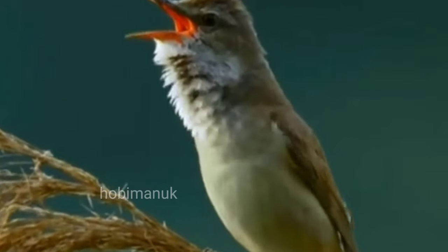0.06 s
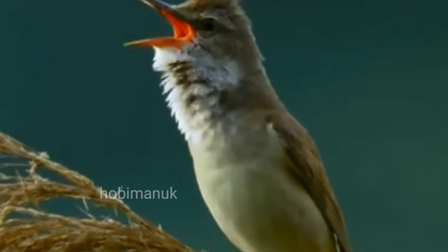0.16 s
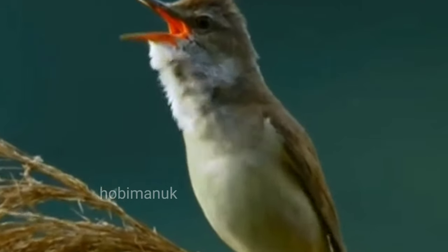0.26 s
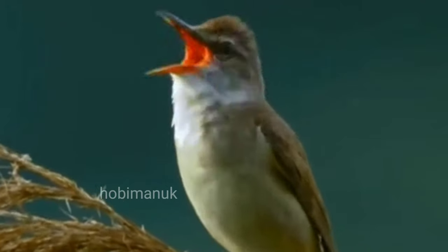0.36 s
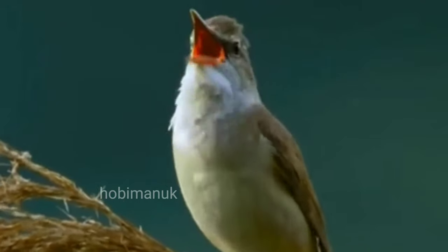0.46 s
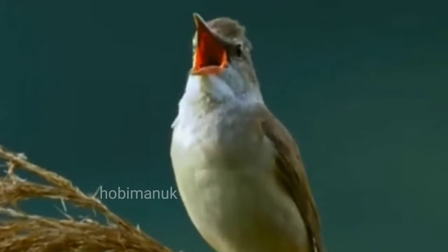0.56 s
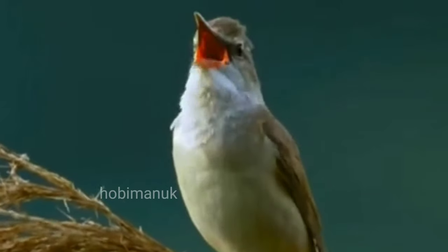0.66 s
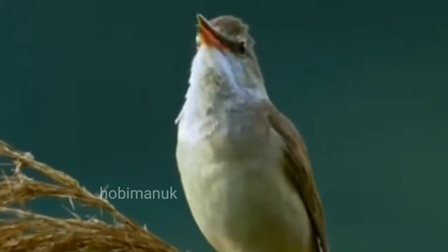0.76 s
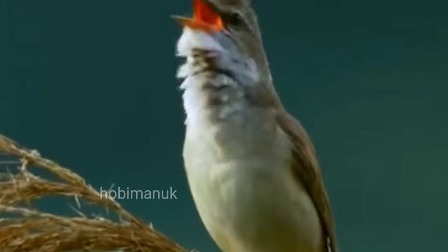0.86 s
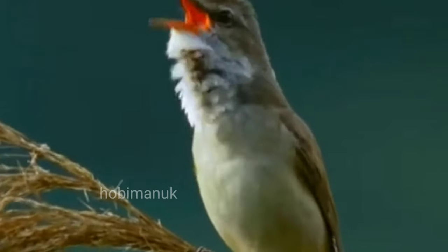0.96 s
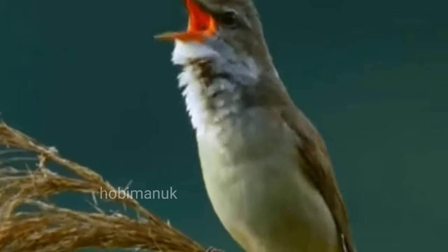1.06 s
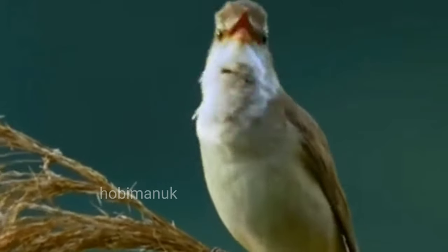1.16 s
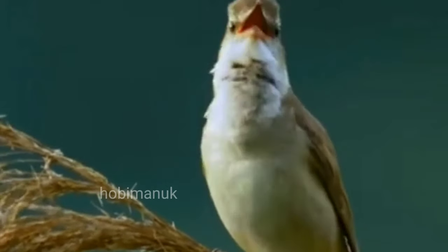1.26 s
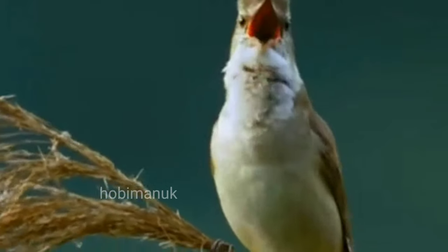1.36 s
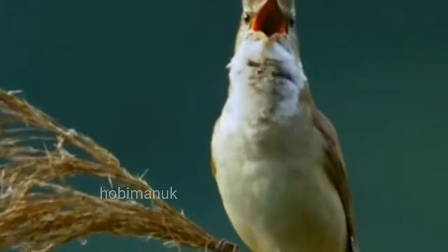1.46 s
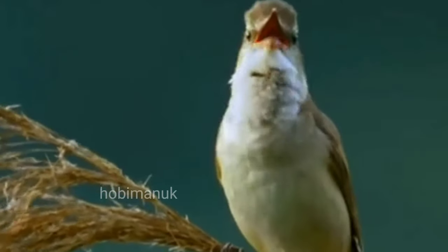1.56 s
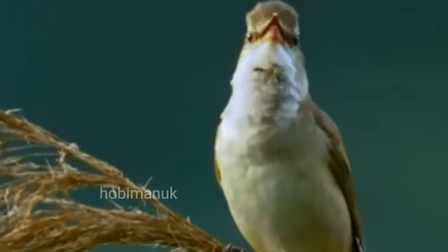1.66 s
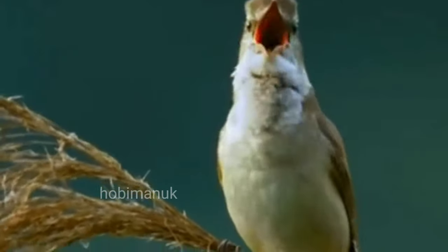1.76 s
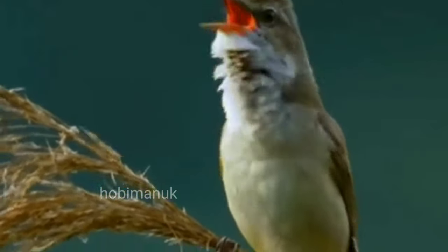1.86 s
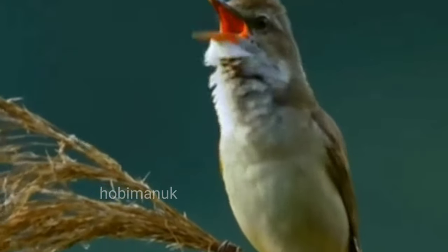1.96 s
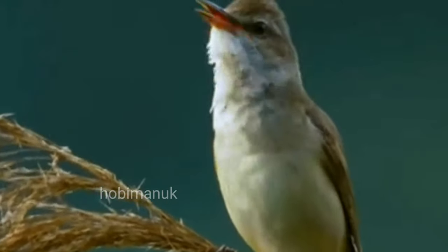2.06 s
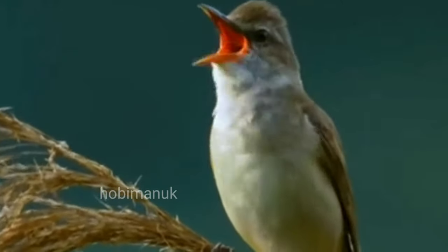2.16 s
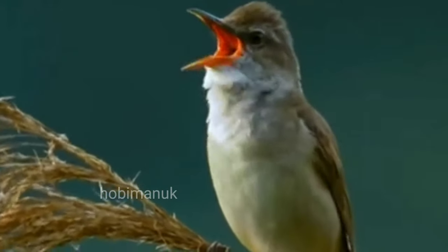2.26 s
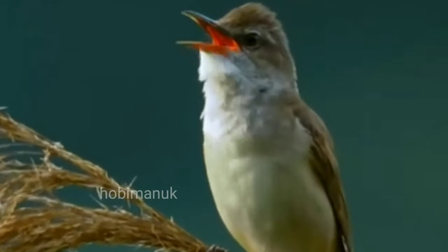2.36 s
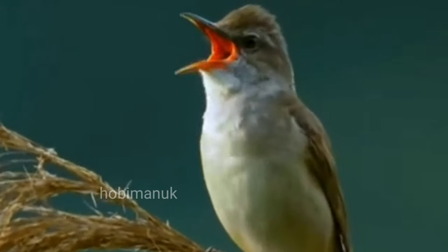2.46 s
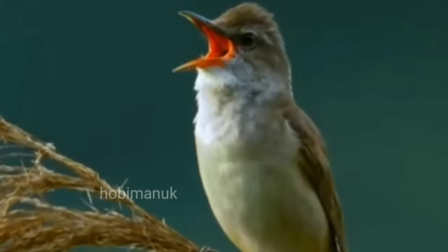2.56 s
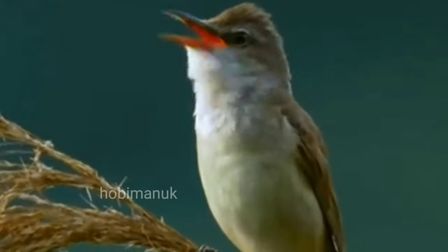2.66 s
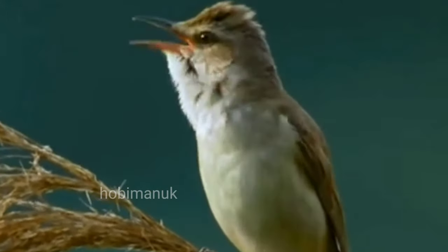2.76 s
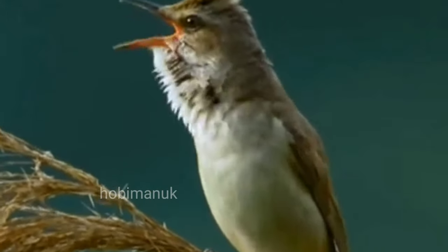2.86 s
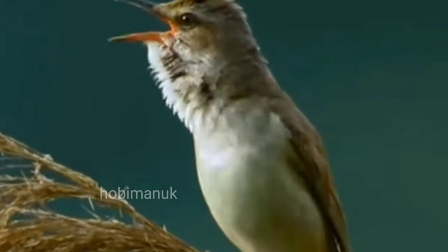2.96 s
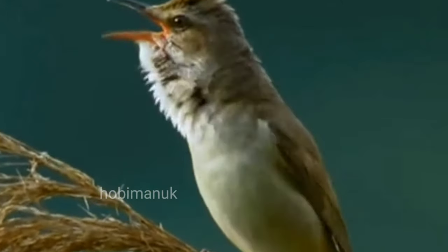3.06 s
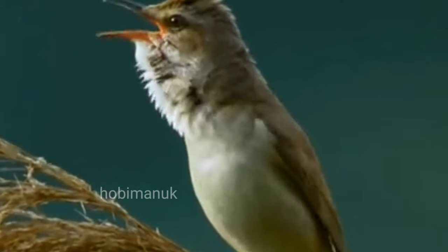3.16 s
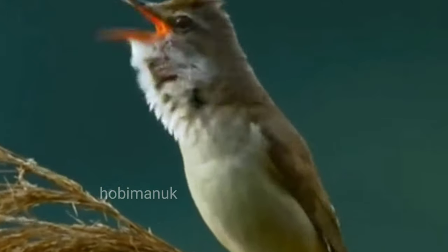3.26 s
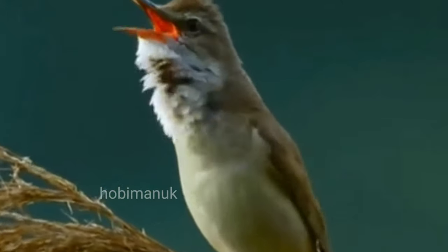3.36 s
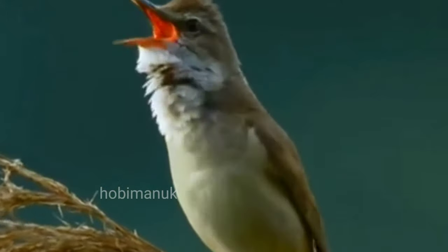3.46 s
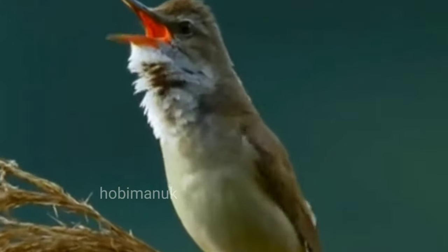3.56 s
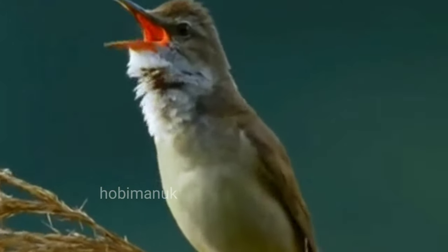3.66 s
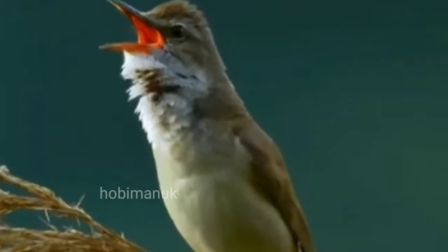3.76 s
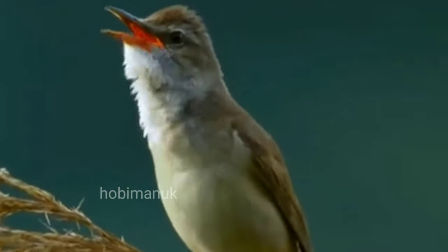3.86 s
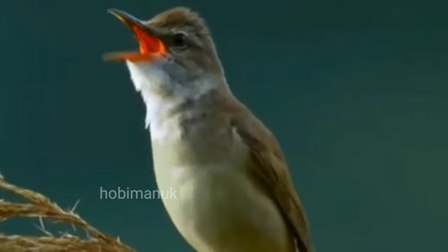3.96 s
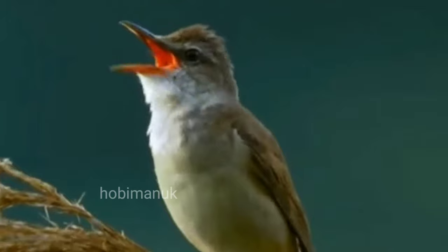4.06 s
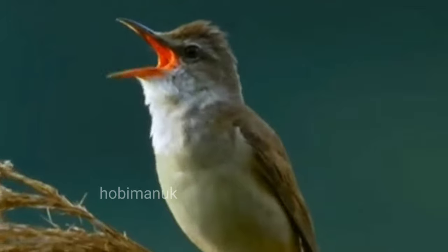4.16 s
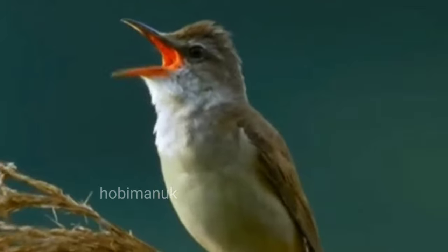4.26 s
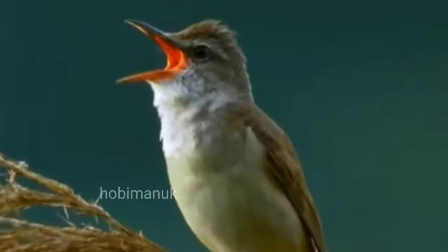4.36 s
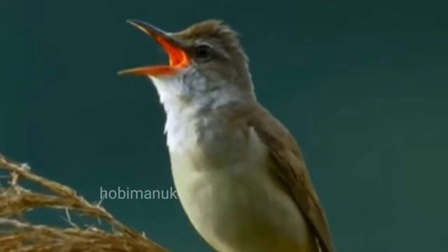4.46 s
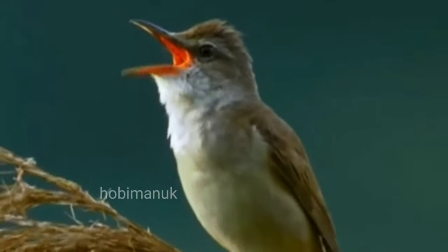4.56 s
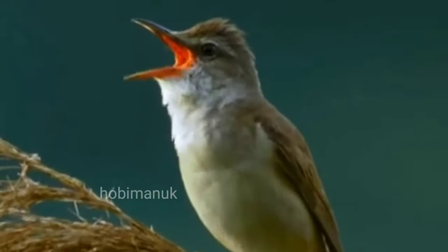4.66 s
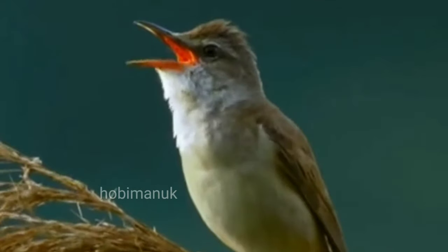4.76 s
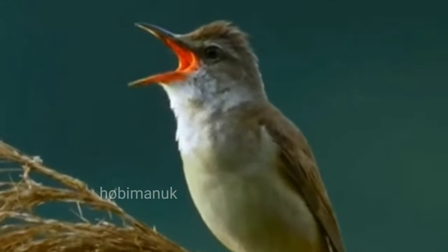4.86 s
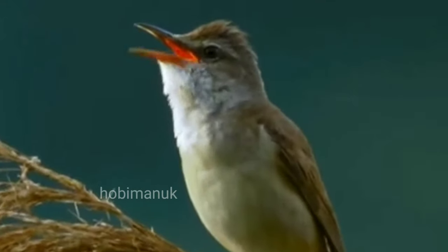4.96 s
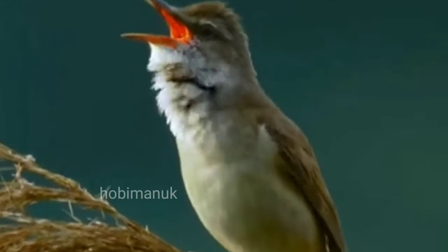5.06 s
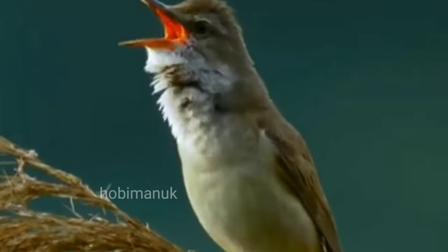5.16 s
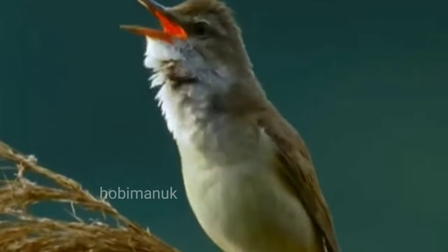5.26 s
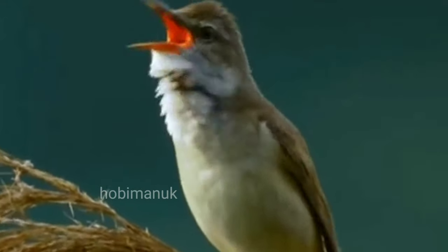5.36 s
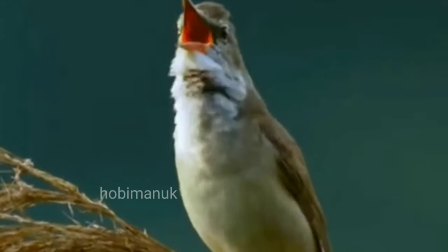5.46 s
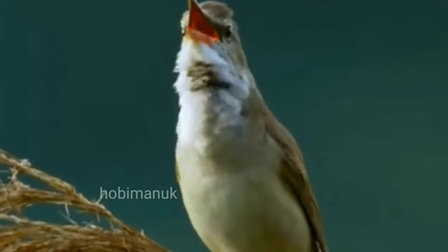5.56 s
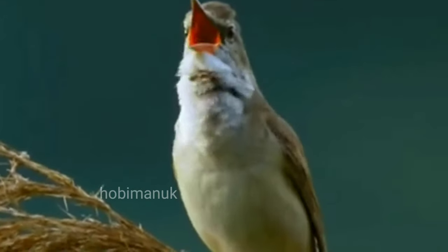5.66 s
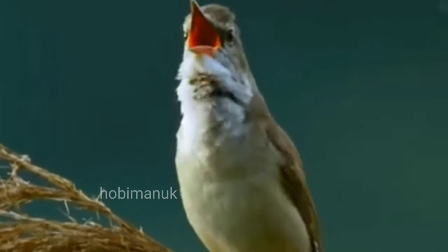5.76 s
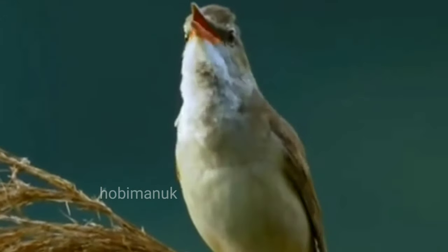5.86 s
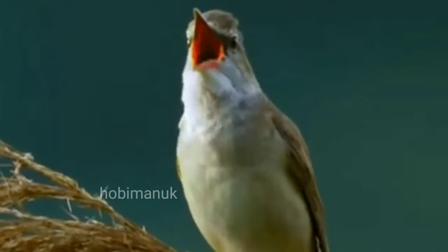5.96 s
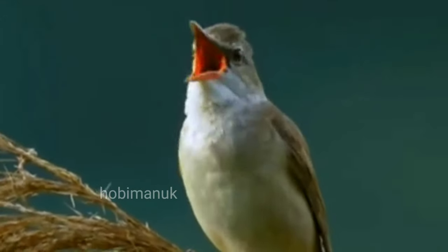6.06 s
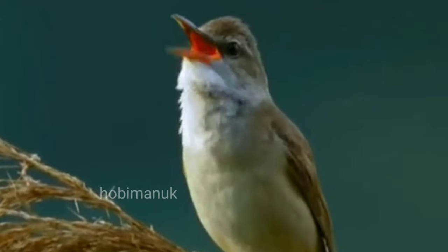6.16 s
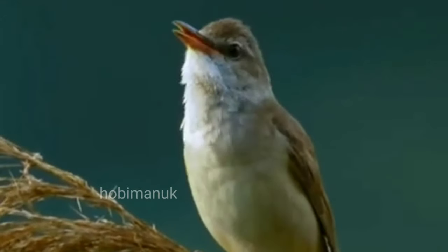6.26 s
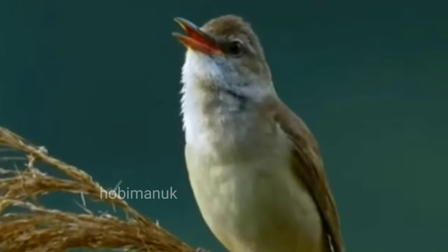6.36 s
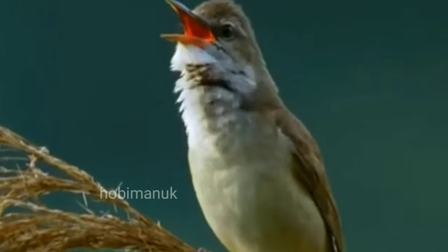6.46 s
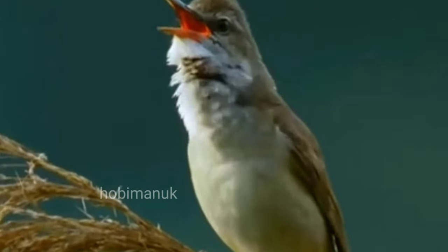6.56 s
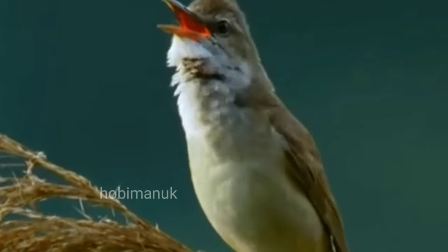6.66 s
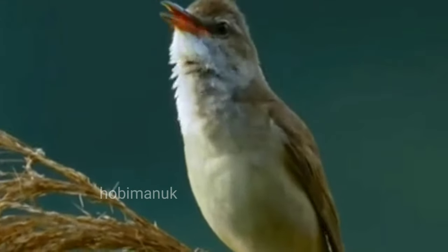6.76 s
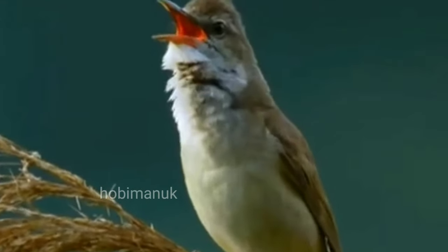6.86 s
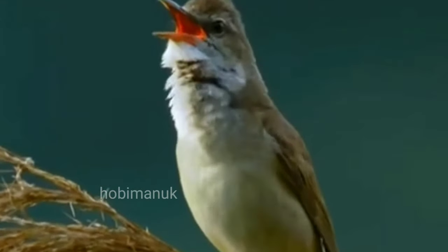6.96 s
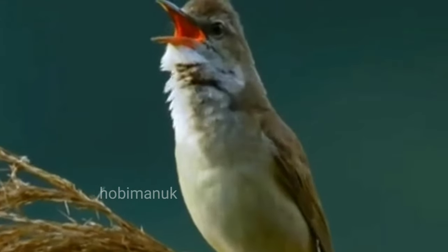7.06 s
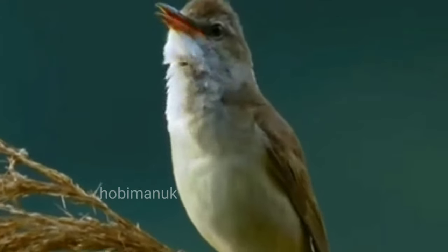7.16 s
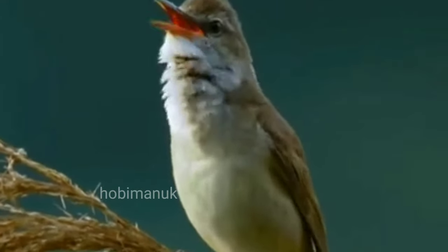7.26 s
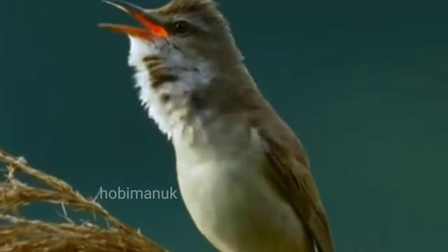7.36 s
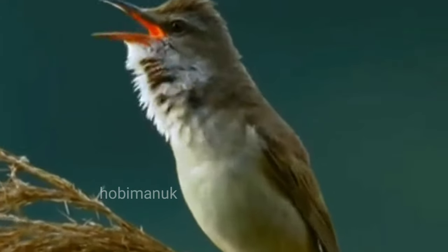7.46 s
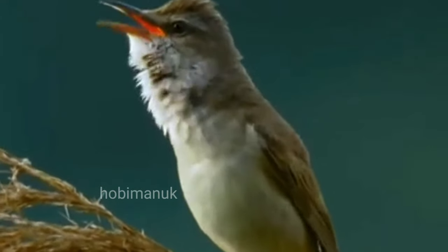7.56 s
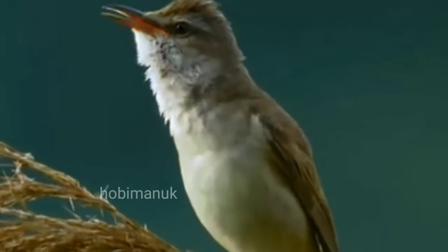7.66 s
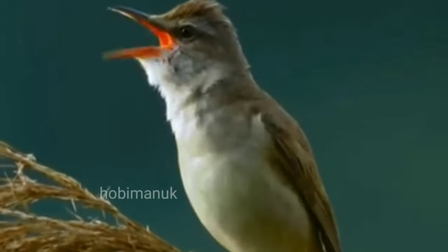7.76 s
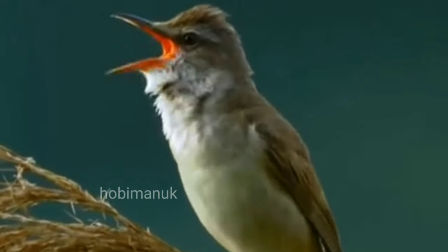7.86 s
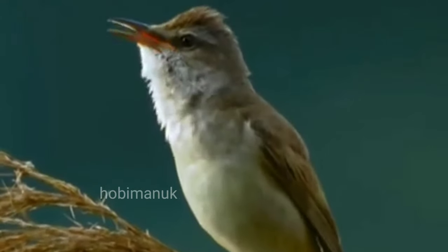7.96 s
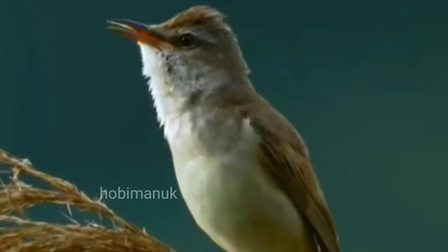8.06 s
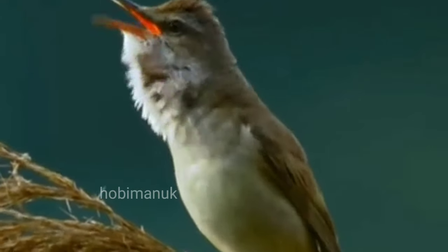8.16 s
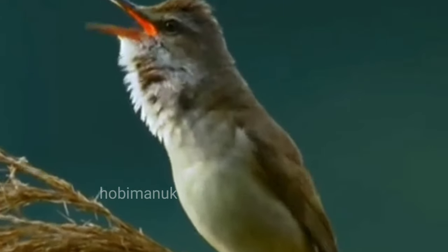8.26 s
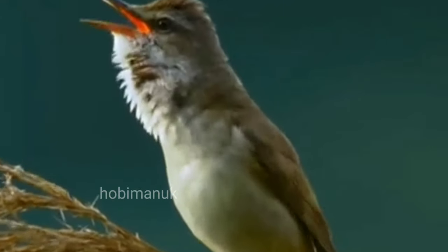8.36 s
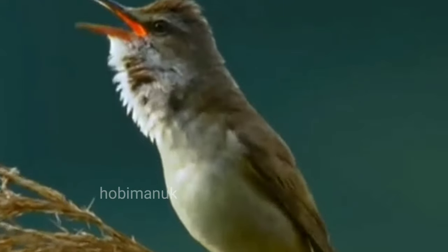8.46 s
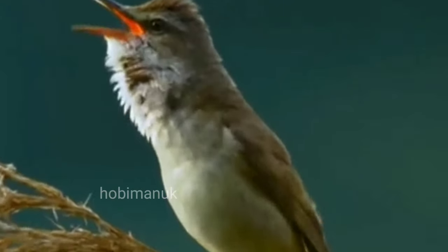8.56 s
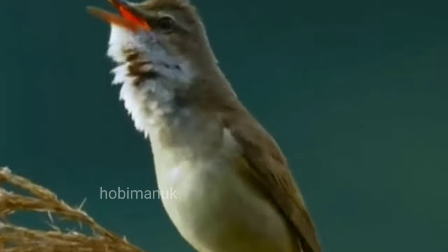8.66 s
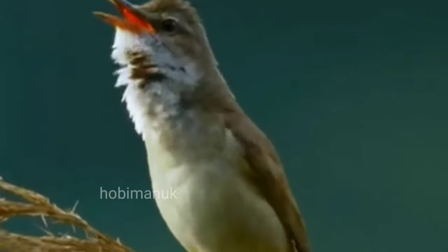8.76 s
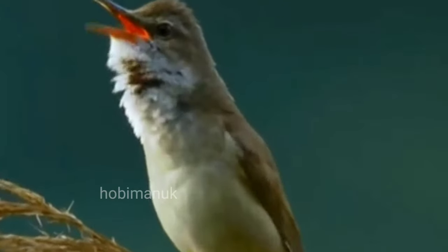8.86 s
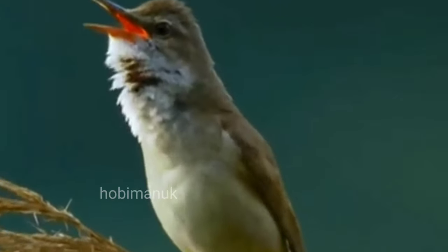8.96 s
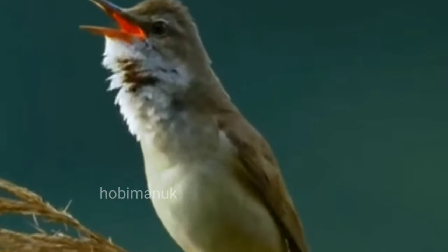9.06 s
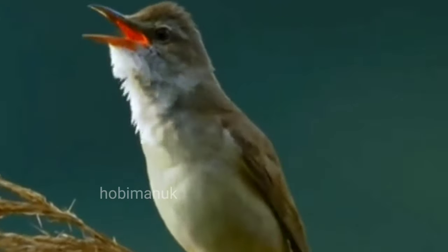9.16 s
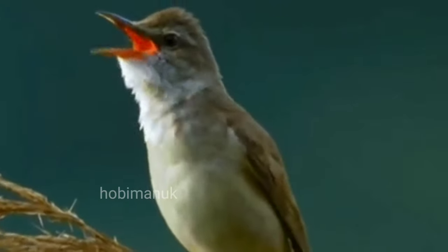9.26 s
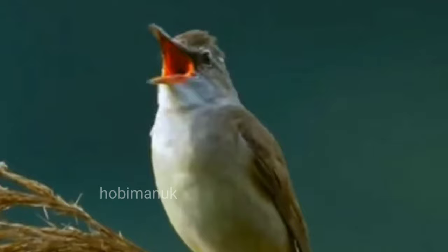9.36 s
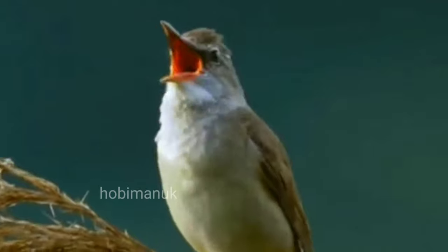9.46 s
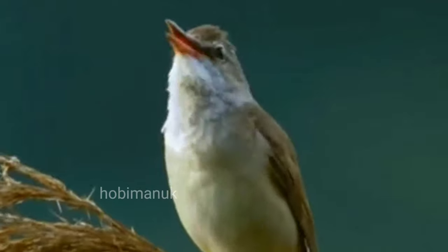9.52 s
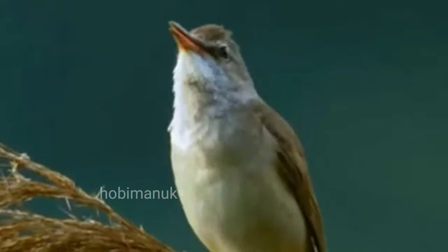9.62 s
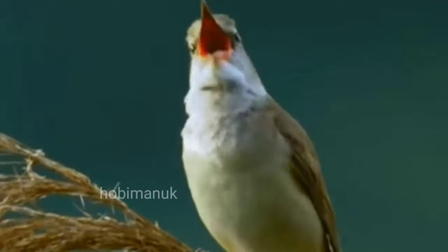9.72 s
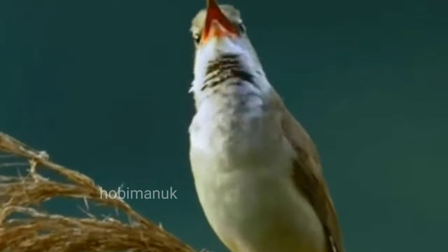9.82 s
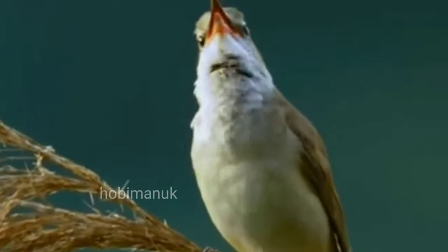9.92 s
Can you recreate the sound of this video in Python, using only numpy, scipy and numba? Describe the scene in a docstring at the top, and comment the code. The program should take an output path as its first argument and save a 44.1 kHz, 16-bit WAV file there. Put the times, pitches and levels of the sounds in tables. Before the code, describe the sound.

A large reed warbler sings close by, loud and centred, starting mid-phrase. At 0-0.3 s come grinding croaks, then two piercing squeals at 0.4-0.7. From 0.9 to 2.0 three pairs of short croaks each flick into a piped tail. Two brief, softer whistles follow at 2.3 and 2.6. Five rough, grating croaks run evenly from 2.9 to 3.9, then six quieter, quick chirrups from 4.1 to 5.0. Three buzzing rattles at 5.1-5.9 lead to the loudest note, a croakless rising pipe near 6.1. Doubled croaks come in pairs from 6.5 to 7.6, a short whistle at 7.9, then about eleven dry chucks hurry by from 8.2 to 9.2. A squeak at 9.4 and a ragged, high-breaking snarl at 9.8 end it. Behind are small bird calls, thin high trills, a diffuse reed echo, wide insect-like hiss and fading low wind.

```python
"""Grating croaks in bursts come first: a large reed warbler singing close by, its song broken by piping notes.
Croaks are uneven membrane slaps ringing resonances; piped notes are overtones picked by the beak resonance.
Soft rasps are shaped hiss. Other birds call in near-sine glides and trill in rapid falling chirps further off.
A diffuse decaying noise tail echoes the birds; coloured insect and air hiss and low wind lie underneath."""
import sys
import numpy as np
from scipy import signal
from scipy.fft import rfft, irfft
from scipy.io import wavfile
from scipy.ndimage import uniform_filter1d
from numba import njit

SR = 44100
rng = np.random.default_rng(int(sys.argv[2]) if len(sys.argv) > 2 else 0)


def put_to_file(sound):
    """Save the sound as 16-bit audio at rate SR, in the file named by the first command-line argument."""
    columns = np.atleast_2d(sound).T  # one column per channel
    safe = np.clip(columns, -1, 1)
    whole_steps = np.round(safe * 32767)
    wavfile.write(sys.argv[1], SR, whole_steps.astype(np.int16))


N = 440559

# the song: t/s, syllable, length/s, level/dB
SONG = [(-.128, "grind", 0.15, -7), (0.094, "grind", 0.17, -9.5), (0.363, "squeal", .13, -6.5),
        (0.562, "squeal", 0.12, -7), (0.94, "krreep", 0.083, -9.5), (1.096, "krreep", 0.079, -10),
        (1.348, "krreep", 0.084, -8.5), (1.51, "krreep", 0.077, -8.5), (1.779, "krreep", 0.071, -8.5),
        (1.936, "krreep", 0.069, -8.5), (2.865, "karra", 0.13, -11.5), (3.086, "karra", .13, -10),
        (3.31, "karra", 0.12, -9.5), (3.523, "karra", 0.12, -9), (3.75, "karra", .13, -8.5),
        (4.059, "chirrup", 0.065, -15.5), (4.229, "chirrup", 0.069, -15), (4.379, "chirrup", 0.076, -18),
        (4.537, "chirrup", 0.076, -17), (4.702, "chirrup", 0.079, -16), (4.888, "chirrup", 0.067, -16.5),
        (5.151, "rattle", 0.15, -8), (5.443, "rattle", 0.14, -6.5), (5.71, "rattle", 0.15, -6.5),
        (6.031, "rise", 0.18, -3), (6.48, "double", 0.079, -12), (6.627, "double", 0.07, -8.5),
        (6.9, "double", 0.083, -10), (7.054, "double", 0.075, -11), (7.347, "double", 0.0796, -10),
        (7.501, "double", 0.071, -10), (8.196, "chuck", 0.036, -14.5), (8.287, "chuck", 0.029, -13),
        (8.374, "chuck", 0.028, -11.5), (8.472, "chuck", 0.018, -10.5), (8.565, "chuck", 0.027, -12),
        (8.659, "chuck", 0.031, -14), (8.757, "chuck", 0.026, -12), (8.849, "chuck", 0.032, -12),
        (8.947, "chuck", 0.032, -12), (9.045, "chuck", 0.028, -11), (9.14, "chuck", 0.028, -11),
        (9.429, "squeak", 0.084, -9), (9.761, "snarl", 0.15, -7.5)]
# croaked bursts by syllable: start and length (shares of the syllable), level/dB, beak resonance f/Hz
CROAKS = {"grind": [(0, 0.57, 0, 2620), (.85, 0.16, 0, 2715)], "krreep": [(0, 0.19, -5, 2655),
          (.23, 0.32, -0.5, 2470)], "karra": [(0, 0.31, -0.5, 2580), (.38, 0.14, -7, 2430),
          (.73, .27, 0, 2560)], "rattle": [(0.02, 0.22, -7.5, 2870), (.24, 0.12, -1.5, 2680),
          (.385, 0.099, -2, 2658), (.53, .225, -2.5, 2620), (.8, 0.17, -2, 2580)],
          "double": [(0, 0.27, -6.5, 2506), (.27, 0.17, -3.5, 2520), (.56, .2, -1.5, 2500),
          (.8, 0.14, -2.5, 2550)], "chuck": [(0, 1.02, 1.5, 2278)], "snarl": [(.03, 0.36, -4, 2594),
          (.46, 0.089, -2, 3530), (.64, 0.063, 0.5, 3760), (.78, .07, 2.5, 3300), (.88, 0.13, -2.5, 2618)]}
# unsteadiness of the membranes by syllable (0-1)
ROUGHNESS = {"grind": .79, "krreep": 0.72, "karra": .79, "rattle": 0.71, "double": 0.63, "chuck": 0.53,
             "snarl": 0.82}
# throat resonances that move with the beak: offset from the beak resonance f/Hz, width/Hz, level/dB
THROAT = [(0, 480, 10), (853, 440, -15)]
# windpipe resonances that stay put: f/Hz, width/Hz, level/dB
WINDPIPE = [(1503, 210, -12.5), (1999, 327, -3.5), (3264, 320, 3)]
# piped notes by syllable: start and length (shares of the syllable), from f/Hz, to f/Hz, level/dB,
# beak resonance f/Hz, swell over the note level/dB, lift of odd partials level/dB (if any)
PIPES = {"squeal": [(0, 0.48, 2922, 2603, -4.5, 3960, 10.6), (.63, 0.412, 2114, 1932, 9.5, 3700, 19.2)],
         "krreep": [(.52, .58, 1458, 1529, -0.67, 2883, 0.17)],
         "chirrup": [(0, 0.37, 1277, 1354, -10.5, 4030, 1), (.25, 0.32, 3164, 3580, 6, 2920, 7),
         (.49, 0.69, 1462, 1448, -3, 4060, -3.5)], "rise": [(.32, .68, 1567, 1766, 11.8, 3397, 26)],
         "squeak": [(0.05, 0.24, 1549, 1511, -3.5, 5000, 10), (.56, 0.52, 1510, 1470, 2.3, 3900, 4.1, 4.6)]}
# level whistles: t/s, length/s, pitch f/Hz, level/dB, beak resonance f/Hz,
# then the grace note that leads in: lead/s, level/dB, beak resonance f/Hz
WHISTLES = [(2.302, 0.091, 1247, -14, 3490, 0.069, -26.5, 4180),
            (2.572, 0.11, 1280, -16, 3590, 0.095, -30.5, 4280),
            (7.903, 0.071, 1196, -14, 3500, 0.0574, -17, 2860)]
# soft rasps of air before piped notes: t/s, length/s, level/dB
RASPS = [(7.814, 0.053, -31.5), (9.357, 0.035, -20)]
# rasps inside a syllable: start and length (shares of the syllable), level/dB
SYLLABLE_RASPS = {"chirrup": [(.22, .3, -6.5)]}
# single calls of other birds: t/s, length/s, from f/Hz, to f/Hz, level/dB
OTHER_CALLS = [(2.72, 0.15, 2650, 2407, -27), (4.213, 0.021, 3650, 2640, -23.5),
               (4.521, 0.01462, 3210, 2385, -25.5), (4.846, 0.016, 3190, 2320, -26),
               (5.879, 0.031, 3240, 3247, -18), (6.132, 0.053, 2870, 2810, -25),
               (7.005, 0.052, 3250, 3207, -17), (7.383, 0.084, 3240, 3216, -23),
               (9.092, 0.28, 3832, 3770, -34.5), (9.502, 0.07, 3013, 3960, -21.5),
               (9.564, 0.034, 2320, 2150, -34), (9.64, 0.063, 2268, 1930, -32),
               (9.714, 0.026, 3500, 3020, -25), (9.898, 0.14, 3296, 3550, -24)]
# repeated figure of a far songbird: t/s into the figure, length/s, from f/Hz, to f/Hz, level/dB
FIGURE = [(0, .025, 5440, 5510, -34), (0.016, 0.028, 5400, 4550, -32), (0.041, 0.052, 4260, 4170, -36.5)]
# starts of that figure: t/s
FIGURE_STARTS = [8.199, 8.355, 8.51, 8.666, 8.815]
# far trills of falling chirps: t/s, length/s, top f/Hz, bottom f/Hz, level/dB
TRILLS = [(0.193, 1.27, 6690, 5160, -60), (1.853, 0.086, 5840, 3860, -45.5), (5.205, 0.64, 6810, 4560, -52),
          (5.995, 0.079, 6600, 4750, -47.5), (6.324, 0.2, 6150, 3890, -52.5),
          (6.718, 0.19, 5376, 3760, -49.5), (9.56, 0.24, 4775, 2838, -41)]
# spectrum of the air and insect hiss: f/Hz, level/dB
HISS_SPECTRUM = [(25, -44), (80, -37), (350, -55), (1000, -41.5), (2000, -51), (5300, -45), (10000, -44.5),
                 (15000, -45.5)]
# course of the wind: t/s, level/dB
WIND = [(0, -55), (1.2, -67.5), (4, -70.5), (9.99, -81)]

# at full roughness: fall and wander of the throat resonance, depth of the grating; then its central rate
CLOSING_HZ, WANDER_HZ, GRATE_DB, GRATE_PER_S = 275, 115, 4.5, 175
GRACE_FROM_HZ, GRACE_TO_HZ, GRACE_ODD_DB = 1640, 1455, -3.5
WHISTLE_SWELL_DB, WHISTLE_WIDTH_HZ = -0.5, 680
ARCH_DB = 7.5  # multiplies the squared distance from mid-note
ECHO_T60_S, ECHO_DB, FAR_ECHO_DB = 1, -3.5, 11.5
TOP_HZ = 15570  # upper limit of the input stage


def croaks(slap_hz=476.5):
    """Source and filter: uneven slaps of the syrinx membranes, gated into bursts, ring the moving throat."""
    bursts = parts(CROAKS)
    rows = [(s - .004, rest[1], ROUGHNESS[name]) for s, _, _, name, rest in bursts]
    starts, beak_hz, rough = np.transpose(rows)
    current = np.maximum(np.searchsorted(starts, np.arange(N) / SR, "right") - 1, 0)
    rough = rough[current]

    # roughness unsettles the spacing and strength of the slaps and lets air hiss through
    jitter = .16 * walk(300.) + .05 * walk(30.)
    phase = np.cumsum(slap_hz * np.exp(rough ** 2 * jitter)) / SR
    slaps = np.diff(np.floor(phase), prepend=0)
    slaps = slaps * undb(3 * rough * rng.standard_normal(N))
    source = slaps / slaps.std() + .3 * rough * rng.standard_normal(N)

    gate, closing = np.zeros((2, N))
    for s, length, db, _, (part_db, _) in bursts:
        u, env = shape(length, 0.0044, 0.0051)
        effort_db = 1.0 - 8.1 * (u - .4) ** 2  # effort arches over the burst
        add(gate, s - .004, undb(db + part_db + effort_db) * env)
        add(closing, s - .004, u - .5)

    # the beak closes through each burst, so the resonances slide down; the throat trembles
    shift_hz = rough ** 2 * (WANDER_HZ * walk(59.5) - CLOSING_HZ * closing)
    open_hz = uniform_filter1d(beak_hz[current] + shift_hz, size=64)
    loudness = np.sqrt(uniform_filter1d(vocal_tract(source, open_hz) ** 2, SR // 60))
    grate_phase = 2 * np.pi * np.cumsum(GRATE_PER_S * np.exp(.3 * walk(40.31))) / SR
    grate = undb(GRATE_DB * rough * np.sin(grate_phase))
    rung = vocal_tract(source * gate * grate / loudness, open_hz)

    # the small head radiates little below the throat's range
    radiation = signal.butter(4, [1300., 5400.], "band", fs=SR, output="sos")
    rung = signal.sosfilt(radiation, rung)
    # the windpipe damps what lies above unless the beak gapes
    damping = signal.butter(7, 3760., fs=SR, output="sos")
    gape = np.clip((open_hz - 3100) / 300, 0, 1)
    return gape * rung + (1 - gape) * signal.sosfiltfilt(damping, rung)


def vocal_tract(x, open_hz):
    """Parallel resonance: throat modes follow the beak opening while windpipe modes stay put."""
    out = np.zeros(N)
    for offset_hz, width_hz, db in THROAT:
        once = moving(x, open_hz + offset_hz, float(width_hz), float(SR))
        out += undb(db) * moving(once, open_hz + offset_hz, float(width_hz), float(SR))
    for hz, width_hz, db in WINDPIPE:
        out += undb(db) * band(x, hz, width_hz)
    return out


@njit
def moving(x, hz, width_hz, rate):
    """Resonance with a moving centre: a state-variable filter carries its two states between samples."""
    y, band_state, low_state = np.empty(len(x)), 0., 0.
    for i in range(len(x)):
        g, k = np.tan(np.pi * hz[i] / rate), width_hz / hz[i]
        v = (band_state + g * (x[i] - low_state)) / (1 + g * (g + k))
        band_state = 2 * v - band_state
        low_state = low_state + 2 * g * v
        y[i] = k * v
    return y


def piping():
    """Amplitude modulation: air pressure flutters the clear notes and turbulence gives a husky edge."""
    out = np.zeros(N)
    for s, length, db, _, (from_hz, to_hz, part_db, *beak) in parts(PIPES):
        add(out, s, note(length, from_hz, to_hz, db + part_db, *beak))
    for s, length, hz, db, beak_hz, lead, grace_db, grace_beak_hz in WHISTLES:
        grace = note(lead, GRACE_FROM_HZ, GRACE_TO_HZ, grace_db, grace_beak_hz, 0, GRACE_ODD_DB)
        add(out, s - lead, grace)
        whistle = note(length, hz, hz, db, beak_hz, WHISTLE_SWELL_DB, least_hz=WHISTLE_WIDTH_HZ)
        add(out, s, whistle)
    flutter = undb(1.3 * walk(70.0))
    husk = undb(-24) * walk(1500.)
    return out * (flutter + husk)


def note(length, from_hz, to_hz, db, beak_hz, swell_db, odd_db=0, least_hz=0):
    """Formant selection: the beak resonance picks overtones of one membrane; a wider beak lifts and broadens it."""
    u, env = shape(length, 0.0052, 0.005)
    bend = np.minimum(u, 1)
    # falls come late, rises level off
    bend = bend ** 2 if to_hz < from_hz else np.minimum(bend / .85, 1)
    scoop = 1 - 0.026 * np.exp(-8 * u)  # each note is scooped from below
    hz = (from_hz + (to_hz - from_hz) * bend) * scoop

    k = np.arange(1, 11)[:, None]  # partial numbers
    partial_hz = k * hz
    width_hz = np.where(partial_hz > beak_hz, 440., 620.)
    width_hz = np.maximum(width_hz, max(beak_hz - 2700, least_hz))
    size = np.exp(-.5 * ((partial_hz - beak_hz) / width_hz) ** 2) * (partial_hz < 6600)
    size = size * undb(odd_db * (k % 2)) + undb(-41.0)  # faint floor under every partial
    power = (size ** 2).sum(axis=0) / 2
    size = size * (partial_hz < SR / 3) / np.sqrt(power)

    phase = k * 2 * np.pi * np.cumsum(hz) / SR + 2 * np.pi * rng.random(k.shape)
    tone = (size * np.sin(phase)).sum(axis=0)
    effort_db = swell_db * (u - 1.3963) - ARCH_DB * (u - .5) ** 2  # effort arches over the note
    return tone * env * undb(db + effort_db)


def rasp():
    """Turbulence noise: short broad hisses as the air catches."""
    gate = np.zeros(N)
    inside = [(s, length, db + rest[0]) for s, length, db, _, rest in parts(SYLLABLE_RASPS)]
    for s, length, db in RASPS + inside:
        add(gate, s, undb(db) * shape(length, length / 2, length / 2)[1])
    lowpass = signal.butter(4, 6500., fs=SR, output="sos")
    hiss = signal.sosfilt(lowpass, band(rng.standard_normal(N), 3630.0, 3400.0))
    return gate * hiss / hiss.std()


def parts(table):
    """Time scaling: syllable shares become (t/s, length/s, sung level/dB, syllable, rest of the row)."""
    rows = []
    for s, name, span, db in SONG:
        for start, share, *rest in table.get(name, []):
            rows.append((s + start * span, share * span, db, name, rest))
    return rows


def other_birds():
    """Superposition: calls and dense far twitter of falling chirps from other birds, with scattered low upward
    swoops of frogs or water; distance roughens them."""
    calls, twitter = np.zeros((2, N))
    figures = [(s + late, *row) for s in FIGURE_STARTS for late, *row in FIGURE]
    for s, *row in OTHER_CALLS + figures:
        add(calls, s, chirp(*row, rise=.6))
    for s, length, top_hz, bottom_hz, db in TRILLS:
        rate = 45 + 3.5 / length  # chirps per second: short outbursts are faster
        span = top_hz - bottom_hz
        draws = rng.random((80, 3))[:int(length * rate) + 1]
        for k, (delay, top, bottom) in enumerate(draws):
            fall = chirp(1.3 / rate, top_hz - span * top / 2, bottom_hz + span * bottom / 2, db)
            add(twitter, s + (k + delay) / rate, fall)
    for when, pitch, level in rng.random((30, 3)):
        swoop = chirp(0.0289, 560 + 400 * pitch, 800 + 400 * pitch, -58 + 10 * level)
        add(calls, when * N / SR, swoop)
    return calls * undb(2.6 * walk(150.0)), twitter * walk(210.0)


def chirp(length, from_hz, to_hz, db, rise=0.028):
    """Frequency modulation: a sine glides in pitch and fades beyond its length; rise is a share of the length."""
    u, env = shape(length, rise * length, 0.83 * length)
    phase = 2 * np.pi * np.cumsum(from_hz + (to_hz - from_hz) * u) / SR
    return np.sqrt(2) * undb(db) * env * np.sin(phase)


def echo(x):
    """Diffuse scattering: reeds and water return a decaying tail; swaying stems blur the pitch."""
    t = np.arange(int(1.2 * SR)) / SR
    tail = rng.standard_normal(len(t)) * undb(-60 * t / ECHO_T60_S) * np.minimum(t / 0.0017, 1)
    tail = tail + 4.76 * rng.standard_normal(len(t)) * undb(-60 * t / 0.2)  # strong, short early return
    # stems scatter only the higher tones
    tail = signal.sosfilt(signal.butter(2, 1900., "high", fs=SR, output="sos"), tail)
    swaying = x * (1 + 0.51 * walk(114.0) + 0.48 * walk(910.0))
    return signal.fftconvolve(swaying, tail / np.sqrt(np.sum(tail ** 2)))[:N]


def marsh():
    """Partly correlated noise: air and insect hiss, with wind rumbling harder on the left port."""
    hz = np.fft.rfftfreq(N, 1 / SR) + 1  # offset avoids log of zero
    node_hz, node_db = np.transpose(HISS_SPECTRUM)
    colour = undb(np.interp(np.log(hz), np.log(node_hz), node_db))
    noise = irfft(rfft(rng.standard_normal((3, N))) * colour, N)
    left, right, both = noise * undb(1.2 * walk(12.))
    gusts = np.array([band(rng.standard_normal(N), 80., 110.) * undb(3 * walk(4.)) for _ in range(2)])
    side_db = np.array([[4.], [-4.]])
    gust_db = np.interp(np.arange(N) / SR, *np.transpose(WIND)) + side_db
    wind = (gusts + 2.7 * gusts[0]) / gusts.std() * undb(gust_db)
    return np.array([left, right]) + both / 2 + wind


def undb(db):
    """Logarithmic level: level/dB becomes an amplitude ratio."""
    return 10 ** (np.asarray(db) / 20)


def band(x, hz, width_hz):
    """Cascaded resonance: the same peak applied twice has steep skirts."""
    b, a = signal.iirpeak(hz, hz / width_hz, SR)
    return signal.lfilter(b, a, signal.lfilter(b, a, x))


def walk(rate):
    """Smoothed noise: two running means leave a random wander of spread 1."""
    k = int(SR / rate)
    x = uniform_filter1d(uniform_filter1d(rng.standard_normal(N), k), k)
    return x / x.std()


def add(out, s, x):
    """Superposition: x joins out from time s; what falls before zero is lost."""
    i = int(s * SR)
    x, i = x[max(-i, 0):], max(i, 0)
    out[i:i + len(x)] += x[:len(out) - i]


def shape(length, rise, fall):
    """Envelope: rounded ends, with time counted in lengths (past 1 while the sound fades)."""
    t = np.arange(int((length + fall) * SR)) / SR
    ramp = np.minimum(t / rise, (length + fall - t) / fall / 2)
    return t / length, np.sin(np.pi / 2 * np.clip(ramp, 0, 1)) ** 2


def scene():
    """Stereo image: the birds and their echo stand in the middle; the marsh lies wide."""
    calls, far = other_birds()
    near = croaks() + piping() + rasp() + calls
    echoed = echo(near * undb(ECHO_DB) + far * undb(FAR_ECHO_DB))
    return near + far + echoed + marsh()


def record(dry):
    """Saturation and band limiting: loud waves are rounded, the loudest peaks clip flat, the top is cut."""
    hot = np.clip(dry - 0.035 * dry ** 3, -1.0, 1.0)
    return signal.sosfilt(signal.ellip(10, .2, 75, TOP_HZ, fs=SR, output="sos"), hot)


dry = scene()
out = record(dry)
put_to_file(out)
```